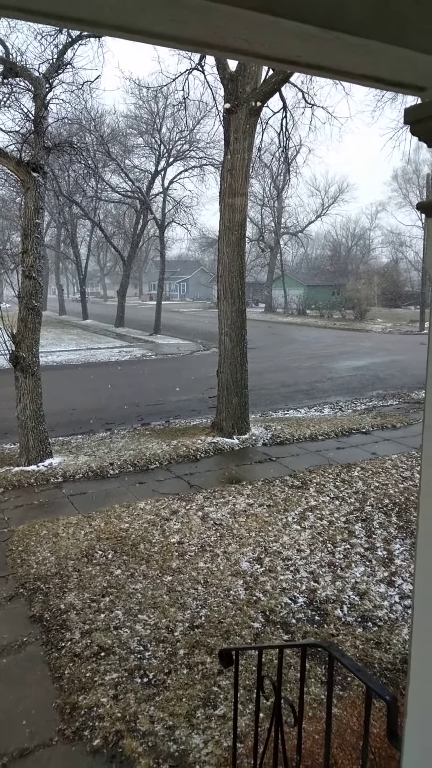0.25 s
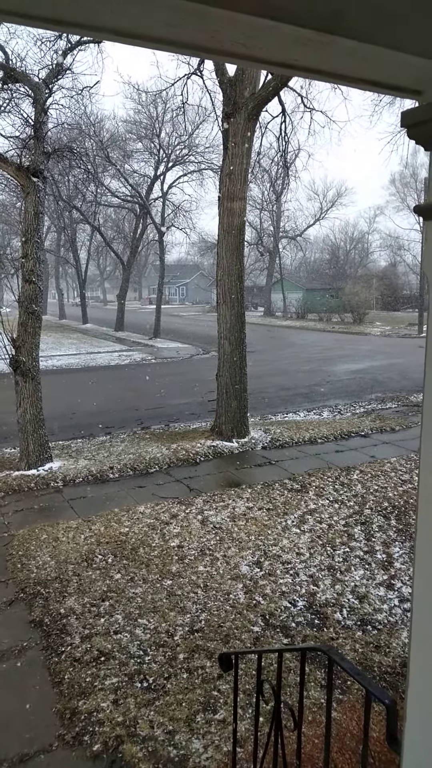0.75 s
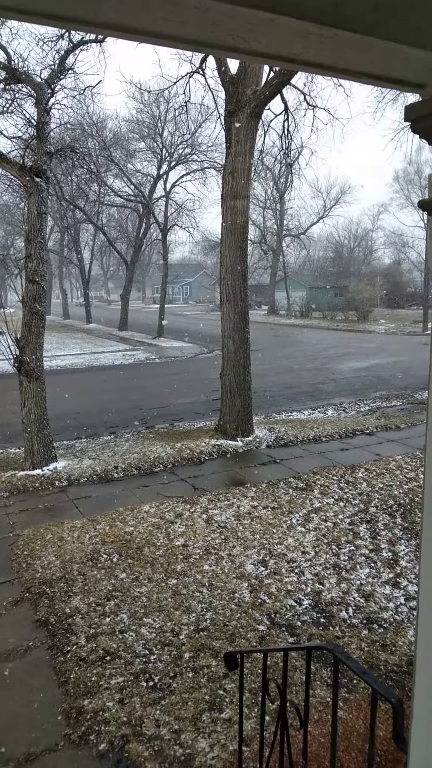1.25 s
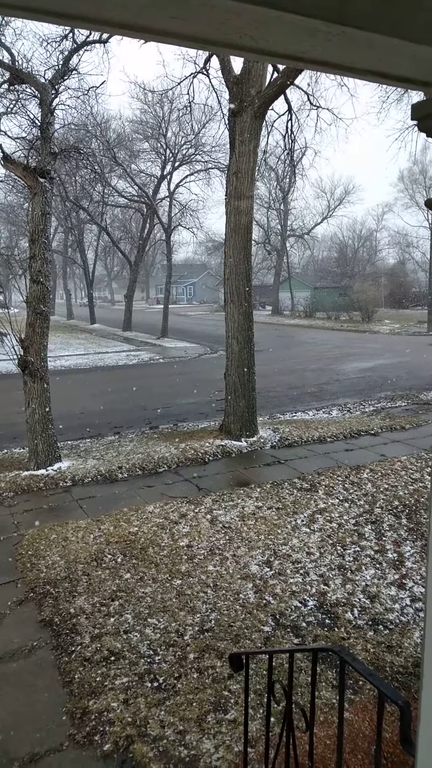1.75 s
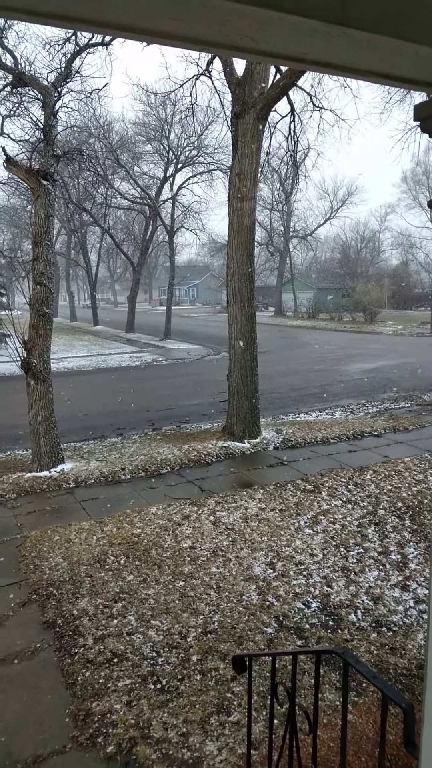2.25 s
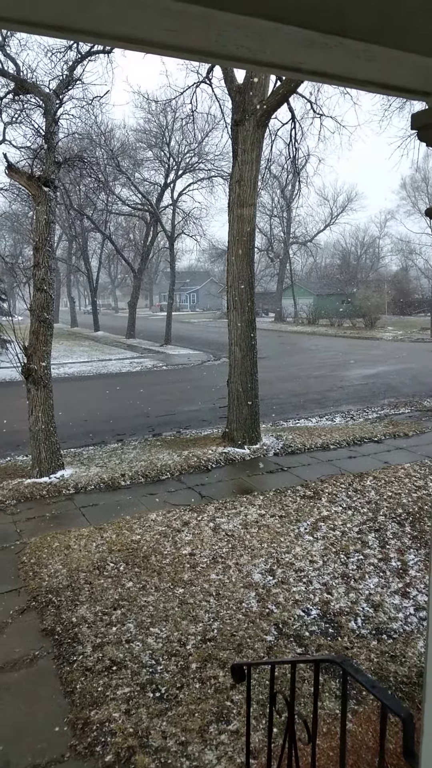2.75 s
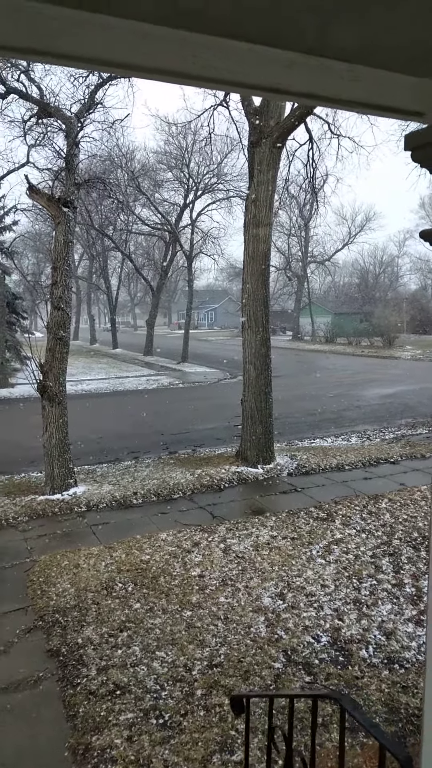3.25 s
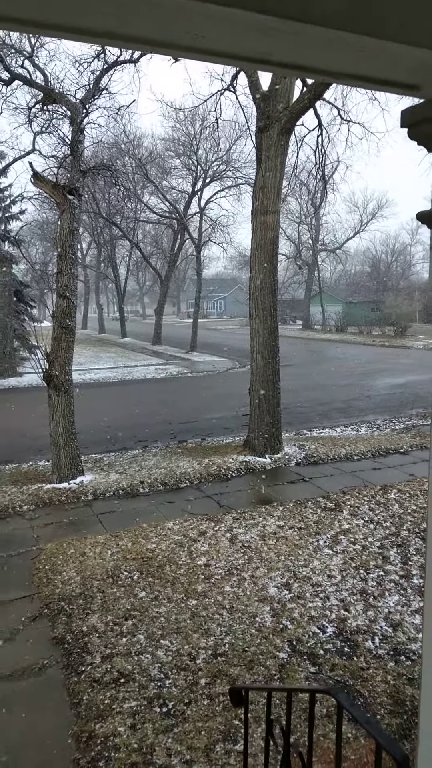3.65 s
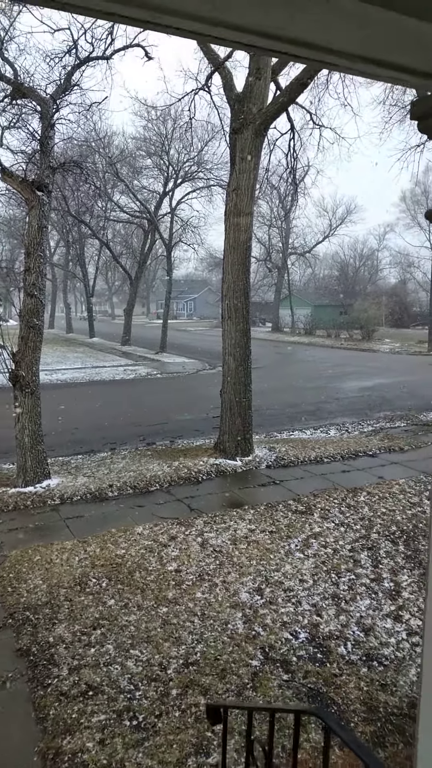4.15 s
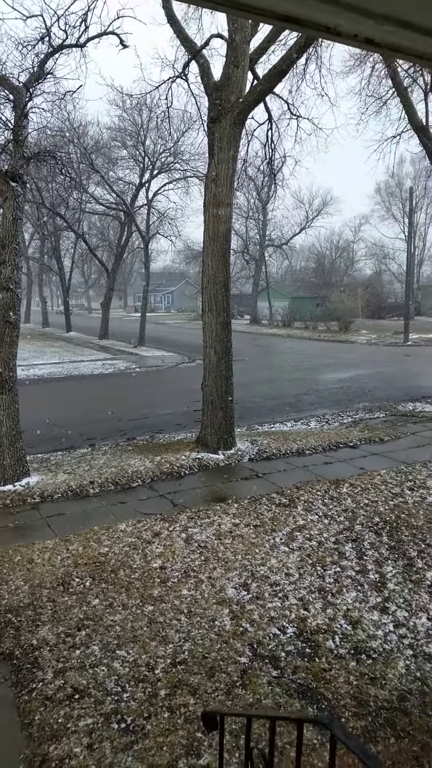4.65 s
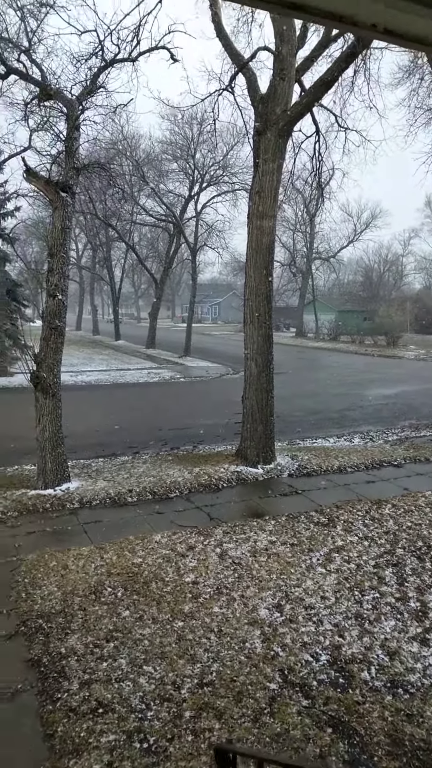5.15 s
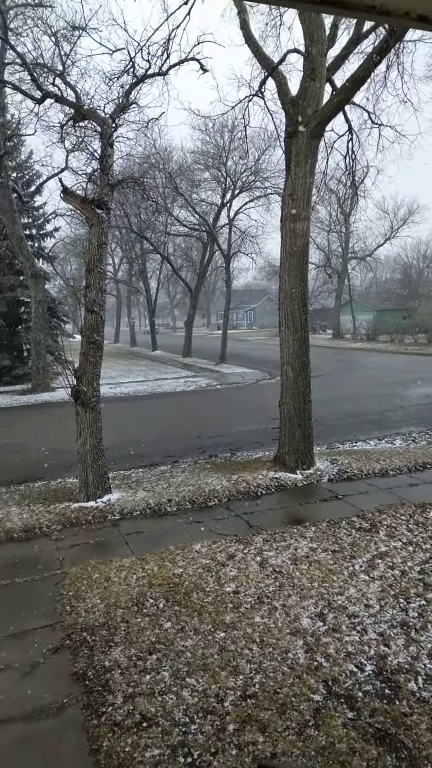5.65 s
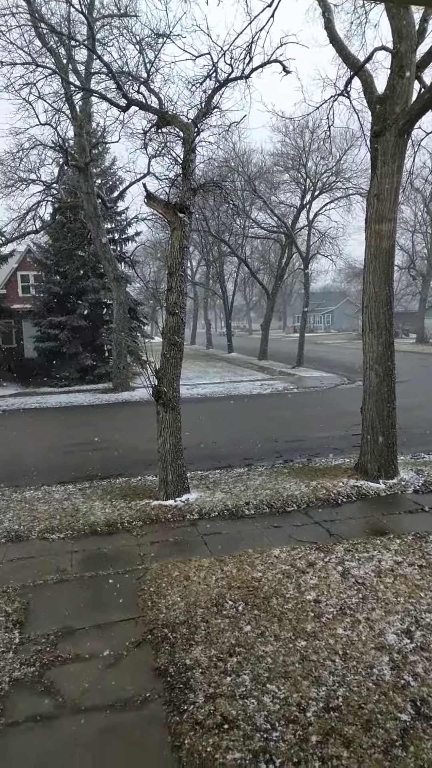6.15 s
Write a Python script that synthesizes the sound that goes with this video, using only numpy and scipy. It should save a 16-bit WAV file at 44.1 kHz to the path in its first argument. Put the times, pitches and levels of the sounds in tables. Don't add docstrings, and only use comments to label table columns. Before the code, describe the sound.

A quiet snowy porch, close and dry, in stereo from a handheld phone. Low distant town rumble and faint machine hums run throughout, with slight hiss. From 0 to 0.5 s, wind rumbles on the right, with a soft push at 0.3, and a few faint pellet ticks. Until about 2.5 s, sparse flurries of millisecond clicks open and shut abruptly, with crisp pings near 0.9 and 2.2. From 2.5 s the patter thickens on rail, steps, boards and lawn, with small wooden taps and soft knocks; a faint thin whine rises around 3.3. A short sleeve brush rustles at 3.75, a long firm raspy one, the loudest rustle, at 4.7 to 4.8, and a quick one at 5.35. Snaps crackle near 5.14 and 6.05. Wind returns after 4.7, with low thumps mostly on the right at 5.65 and strongest at 6.27, until the end at about 6.4.

```python
import sys
import numpy as np
from scipy import signal
from scipy.fft import rfft, irfft
from scipy.io import wavfile
from scipy.ndimage import uniform_filter1d

SR = 44100
rng = np.random.default_rng(int(sys.argv[2]) if len(sys.argv) > 2 else 0)


def makeup_ratio(level_db):
    decades = np.asarray(level_db, float) / 20
    return 10 ** decades


def persist_wave(psi):
    counts = np.round(np.clip(psi, -1, 1) * 32767).astype(np.int16)
    wavfile.write(sys.argv[1], SR, np.atleast_2d(counts).T)


N = 282240
t = np.arange(N) / SR


def colour(x, *tables):
    hz = np.log(np.arange(N // 2 + 1) * SR / N + 1)
    db = 0
    for table in tables:
        point_hz, point_db = np.array(table).T
        db = db + np.interp(hz, np.log(point_hz), point_db)
    return irfft(rfft(x) * makeup_ratio(db), N)


def level(x, db):
    return x * makeup_ratio(db) / np.sqrt(np.mean(x ** 2))


def walk(rate_hz):
    hold = int(SR / rate_hz)
    steps = np.repeat(rng.standard_normal(N // hold + 1), hold)
    return 1.393 * uniform_filter1d(uniform_filter1d(steps, hold), hold)[:N]


# pitch_hz, level_db
LEFT_PORT = [(1000, 7.5), (2300, 10), (5000, 2.5), (7100, 12.5), (8100, 4), (8800, -9.5), (13000, -10)]
RIGHT_PORT = [(1000, 6.5), (2300, 5), (5000, 0), (7500, -5.5), (10000, 5), (11500, -4), (14000, -14)]
TREBLE_LIMIT = [(15700, 0), (15900, -30)]


def through_ports(x, *tables):
    left = colour(x[0], LEFT_PORT, TREBLE_LIMIT, *tables)
    right = colour(x[1], RIGHT_PORT, TREBLE_LIMIT, *tables)
    return np.array([left, right])


# start_s, length_ms, patter_db at start, bright_minus_dull_db
STRUCK = [(.054, 27, -64.5, -2.5), (.1, 24, -69.5, 1), (.853, 18, -65, -0.5), (.916, 50, -57.5, 16),
          (1.853, 25.5, -59, -3), (1.916, 16, -63.5, -2), (2.001, 31, -61, -7), (2.358, 20, -68, -1),
          (2.58, 15, -62.5, -23), (2.744, 16, -65, -5), (2.773, 29, -64, -12), (2.872, 34, -58, -2.5),
          (3.385, 71, -57, -4), (3.495, 32, -65, -10), (3.59, 14.6, -67.5, -4.5), (4.094, 23, -67, -8),
          (4.123, 30, -60.5, -1.5), (4.49, 28, -61, -3.5), (4.936, 44.4, -57.5, -4.5),
          (5.005, 38.5, -58, -0.5), (5.205, 32.4, -55, -1), (5.556, 21, -61.5, 1.5),
          (5.603, 22, -60.5, -13), (5.85, 11, -64.5, -1), (.687, 13, -72.5, -6), (.835, 8, -73, 1.1),
          (5.881, 19, -67.5, -4), (5.917, 32, -59, -11), (5.994, 22, -62, -5), (6.079, 31, -64, 1.5),
          (3.916, 41, -57, -4.5), (4.369, 15, -56.5, -8), (4.384, 19.7, -54, -3), (4.405, 27, -54, -8)]
# start_s, length_ms, patter_db at end, bright_minus_dull_db
SWELLS = [(.605, 22, -63.5, -3.5), (.634, 33, -64, 0.5), (.73, 22.5, -65, 5), (.772, 24, -66, -2),
          (.972, 59, -60.5, 0), (1.339, 39, -63.5, 4), (1.505, 24, -66, 1), (2.518, 14.6, -70, 1.1),
          (1.702, 54.5, -67.5, 4.5), (2.179, 22, -64, 5), (2.474, 28.5, -65.5, -5), (2.593, 59, -58.5, 0.5),
          (2.676, 36.5, -62, -3.5), (2.852, 18.7, -64, 7), (3.308, 47, -60.5, -4), (3.364, 21, -59.5, 1),
          (3.432, 21, -75, -5), (3.854, 16, -67, -2), (4.21, 44.3, -61, -3), (4.262, 29.7, -63.5, -5.5),
          (4.337, 32, -61.5, 7), (4.525, 36, -62.5, -1), (4.566, 31.5, -63, -.6), (5.082, 43.7, -61.5, 0.5),
          (5.13, 75, -60, 0.5), (5.245, 35, -74, -7), (5.42, 25, -69, -2), (5.529, 26, -66, 0),
          (6.02, 19, -67, -2.1), (6.05, 29, -58, 2.5), (4.473, 18, -70, -6), (4.17, 33, -78, -3),
          (4.292, 45, -75.5, -6.5)]
# start_s, length_ms, patter_db, bright_minus_dull_db
EVEN = [(.032, 11, -74, -3), (.168, 22, -73, 4), (1.213, 15, -70.5, -2), (1.301, 12, -70.5, -4),
        (1.409, 27, -66, -0.5), (1.447, 19, -72.5, -2), (1.651, 17, -67, -2.5), (1.955, 11, -71, -4),
        (2.063, 7, -69, 5), (2.281, 28.4, -65.5, -1), (2.952, 21.5, -65, -4.5), (3.099, 32, -66.5, -4.5),
        (3.214, 45, -65, -3), (3.458, 25.5, -67, 1), (3.878, 38, -63.5, -2.5), (3.957, 22, -68.5, -4),
        (4.153, 17, -71, -4), (4.43, 44, -59.5, 1.5), (5.955, 13, -68, -6), (4.9, 30, -66.5, -2),
        (4.996, 11, -63.5, 3), (5.275, 35, -64.5, -3.5), (5.455, 33, -69, -0.5), (5.497, 31, -64.5, 0),
        (5.591, 11, -72, 15), (5.652, 12, -74, 6), (4.008, 9.9, -74, -5), (5.787, 22, -69.5, -2),
        (6.211, 7.4, -74.5, -8), (6.358, 8.3, -68, -7), (.012, 8, -67, -2), (.152, 5, -76, 8),
        (.294, 7.2, -73, -2), (.313, 4.8, -75, 6), (.354, 6.2, -73, 3), (.38, 4, -77, 6), (.42, 5, -76, -4),
        (.565, 14, -75, -3), (1.538, 12, -72.5, 1), (1.599, 5.5, -72.5, -5), (1.843, 6.4, -74, 8),
        (1.937, 8.9, -72, -6), (2.214, 9, -71, 0), (2.817, 7.7, -71, 2), (3.285, 6, -70, .5),
        (3.553, 12, -73, -7), (5.076, 2.9, -66, -21), (5.254, 7, -71, 1), (5.706, 21, -74.5, -4),
        (5.869, 6, -75, -3)]
# time_s, patter_db, bright_minus_dull_db
BRUSHES = [
    [(3.693, -67, -4), (3.708, -60, -3.5), (3.754, -51.5, -4), (3.812, -54, -3), (3.844, -62, -5)],
    [(4.667, -64, -6), (4.678, -57, 0), (4.703, -50.5, 4), (4.714, -45, -8), (4.741, -45.5, -1.5),
     (4.757, -44.5, 0), (4.785, -49.5, -2), (4.81, -58, -5), (4.828, -62.5, -2)],
    [(5.322, -66, -4), (5.333, -56.5, -2), (5.357, -49.5, 2), (5.395, -58, -6.5), (5.417, -61, 7)],
]
SHUT_DB, SHUT_BRIGHT_DB = -86.5, 7.5
FADE_DB, BUILD_DB = 5.5, 7.5
BLOW_DB, BLOW_S = 0.5, 0.0011


def gate():
    db = SHUT_DB + walk(25)
    bright_db = np.full(N, SHUT_BRIGHT_DB)
    for table, start_db, end_db in ((STRUCK, 0, -FADE_DB), (SWELLS, -BUILD_DB, 0), (EVEN, 0, 0)):
        for start_s, length_ms, patter_db, tilt_db in table:
            span = slice(int(start_s * SR), int((start_s + length_ms / 1000) * SR))
            db[span] = patter_db + np.linspace(start_db, end_db, len(db[span]))
            bright_db[span] = tilt_db
    for start_s, *_ in STRUCK:
        db += BLOW_DB * (t > start_s) * np.exp(-np.abs(t - start_s) / BLOW_S)
    for time_s, patter_db, tilt_db in map(np.transpose, BRUSHES):
        span = (t >= time_s[0]) & (t < time_s[-1])
        db[span] = np.interp(t[span], time_s, patter_db)
        bright_db[span] = np.interp(t[span], time_s, tilt_db)
    return uniform_filter1d(db, size=70), uniform_filter1d(bright_db, size=70)


PORT_LAG = 24


def grains(per_s, spread_db, blur, alike):
    size_db = spread_db * np.minimum(rng.exponential(size=N), 1.5)
    hits = (rng.random(N) < per_s / SR) * makeup_ratio(size_db)
    burst = level(signal.lfilter([1], [1, -np.exp(-1 / (0.0011 * SR))], hits), 0)
    burst = np.minimum(burst, 2.1) + blur
    left, other = rng.standard_normal((2, N))
    alike = np.clip(alike, 0, 1)
    right = np.roll(burst * (alike * left + np.sqrt(1 - alike ** 2) * other), PORT_LAG)
    return np.array([burst * left, right * makeup_ratio(2.0 * walk(120))])


# pitch_hz, level_db
DULL = [(200, -30), (600, 0), (1300, -4), (2300, -3.5), (3000, -2.5), (4200, -9.5), (5500, -11.5),
        (8000, -51)]
BRIGHT = [(2500, -13), (4000, -0.5), (5500, -3), (8000, -3.5), (11000, -3.5), (15000, -8.5)]
TOP_KNEE_DB, TOP_LOSS = -61, 0.38


def patter(db, bright_db):
    layers = []
    for body, low_hz, bands, alike in ((DULL, 600, 5, .55), (BRIGHT, 3500, 4, .1)):
        layer = 0
        for hz in low_hz * 1.728 ** np.arange(bands):
            band = [(hz / 2.2, -30), (hz / 1.3, -3), (hz * 1.3, -3), (hz * 2.2, -30)]
            raw = grains(per_s=900, spread_db=3.2, blur=.8, alike=alike)
            layer = layer + makeup_ratio(1.3 * walk(35)) * through_ports(raw, body, band)
        layers.append(level(layer, 0))
    dull, bright = layers
    top = colour(bright, [(11000, -37), (12800, -17)])
    bright = bright - top * (1 - makeup_ratio(-TOP_LOSS * np.maximum(db - TOP_KNEE_DB, 0)))
    dull_share = 1 / (1 + makeup_ratio(2 * bright_db))
    dull = makeup_ratio(-0.42) * np.sqrt(dull_share) * dull
    bright = makeup_ratio(-1.08) * np.sqrt(1 - dull_share) * bright
    return makeup_ratio(db) * (dull + bright)


# pitch_hz, level_db per Hz
TOWN = [(10, -7), (25, -1), (60, -3.5), (110, -4.5), (200, -11.5), (400, -16), (640, -20), (900, -26.5),
        (1300, -36), (2400, -89)]
# pitch_hz, likeness (0-1)
LIKENESS = [(30, 1), (130, 0.98), (290, 0.77), (640, 0.29), (1400, 0)]
TOWN_DB = -52.5


def town(db):
    out, swell = 0, walk(5)
    lift_db = uniform_filter1d(np.clip(db + 75.0, 0, 22), size=300)
    like_hz, likeness = np.array(LIKENESS).T
    for hz in 14 * 2 ** np.arange(0, 7.6, .5):
        band = [(hz / 2 ** .5, -40), (hz / 2 ** .3, -6), (hz, 0), (hz * 2 ** .3, -6), (hz * 2 ** .5, -40)]
        mid, side = colour(rng.standard_normal((2, N)), band, TOWN)
        like = np.clip(np.interp(np.log(hz), np.log(like_hz), likeness), 0, 1)
        drift_db = 0.28 * swell * (hz > 150) + 0.79 * walk(2.73)
        gain = makeup_ratio(drift_db + 0.25 * lift_db * min(hz / 440.0, 1))
        out = out + gain * (np.sqrt(1 + like) * mid + np.sqrt(1 - like) * side * np.array([[1], [-1]]))
    return level(out, TOWN_DB)


# pitch_hz, width_hz, level_db
HUMS = [
    (84.02, 0.98, -61.5),
    (103.5, 7.8, -72.5),
    (318.5, 18, -70),
    (383.1, 4.6, -71),
]
# time_s, level_db
WHINE = [
    (2.9, -83),
    (3.3, -68),
    (5.6, -72),
    (5.9, -77),
]
WHINE_HZ = 614


def machinery():
    whine_db = np.interp(t, *np.transpose(WHINE)) + 2.1 * walk(14)
    out = makeup_ratio(whine_db) * np.sin(2 * np.pi * np.cumsum(WHINE_HZ + walk(3.08)) / SR)
    for hz, width_hz, db in HUMS:
        hum = signal.lfilter(*signal.iirpeak(hz, hz / width_hz, SR), rng.standard_normal(N))
        out = out + level(hum, db)
    return out


# time_s, level_db
WIND = [(0, -41.5), (.08, -44), (.2, -45.5), (.26, -49), (.45, -56.5), (4.6, -57), (4.82, -47),
        (5.05, -50.5), (5.45, -50.5), (5.62, -44), (5.9, -43.5), (6.16, -47.5), (6.3, -41.5), (6.4, -52)]
# pitch_hz, level_db per Hz
GUST = [(4, -3), (25, 11), (50, -3.5), (90, 0.5), (160, -24), (400, -81)]
# time_s, peak_db, swing_ms, sign, left_share
BUFFETS = [
    (.299, -27, 3.25, 0.9, 0.025),
    (4.687, -33.5, 3.35, -1.32, 0.67),
    (5.635, -33.5, 6.4, -1.1, .03),
    (5.662, -25, 3.4, -0.76, .03),
    (6.266, -22, 5.1, 1, 0.018),
    (6.346, -32, 5.2, -0.89, 0.027),
    (6.385, -29.5, 4.5, 1, .03),
]


def wind():
    rush_db = np.interp(t, *np.transpose(WIND)) + 1.0
    rush = level(colour(rng.standard_normal(N), GUST), 0) * makeup_ratio(rush_db)
    out = np.array([0.06 * rush, rush])
    for s, db, swing_ms, sign, left_share in BUFFETS:
        u = (t - s) * 1000 / swing_ms
        push = np.exp(-u ** 2) - 0.52 * np.exp(-((u - 2.4) / 2.1) ** 2)
        out += sign * makeup_ratio(db) * push * np.array([[left_share], [1]])
    return out


# pitch_hz, level_db per Hz
HISS = [(1000, -5), (2000, 2), (3200, -5), (5000, -3), (8000, -14), (11000, -6), (15000, 6)]
HISS_DB = -85.5


def hiss():
    return level(through_ports(rng.standard_normal((2, N)), HISS), HISS_DB)


# time_s, left_db, right_db, fade_ms
SNAPS = [
    (5.136, -52, -52, .7),
    (5.149, -58, -58, .5),
    (.987, -57, -50, .6),
    (2.179, -54, -54, .6),
    (3.252, -63, -62, .5),
    (4.939, -58, -58, .5),
    (6.045, -49, -48, 0.88),
    (6.048, -53, -49, .6),
    (6.06, -53, -42, 0.92),
]
CRACK_DB, CRACK_MS = -6, .3


def snaps():
    cracks = [(s, db + CRACK_DB, db + CRACK_DB, CRACK_MS) for s, _, db, _ in STRUCK]
    out = 0
    for s, left_db, right_db, fade_ms in list(SNAPS) + cracks:
        fade = (t > s) * np.exp(-np.abs(t - s) * 1000 / fade_ms)
        out = out + makeup_ratio(np.array([[left_db], [right_db]])) * fade
    spray = out * makeup_ratio(3.0 * walk(201)) * rng.standard_normal((2, N))
    return colour(spray, [(3000, -23), (9000, -0.5), (15700, 2), (16600, -14), (17000, -50)])


# start_s, peak_db, pitch_hz
TAPS = [(.055, -63, 626), (1.407, -61, 700), (1.744, -52, 560), (1.935, -54, 520), (2.357, -55, 580),
        (2.563, -55, 595), (2.746, -52, 625), (3.121, -50, 600), (3.291, -52, 517), (3.512, -53, 486),
        (4.388, -52, 595), (4.718, -58, 800), (5.231, -54, 1050), (5.787, -54, 600), (6.245, -54, 660),
        (6.334, -60, 500)]
TAP_FADE_S = 0.0042


def taps():
    out = np.zeros(N)
    for s, db, hz in TAPS:
        age = np.maximum(t - s, 0)
        out += makeup_ratio(db + 0.5) * np.exp(-age / TAP_FADE_S) * np.sin(2 * np.pi * hz * age)
    return out


# time_s, peak_db, pitch_hz
KNOCKS = [(2.029, -62.5, 333), (2.55, -60.5, 277), (2.78, -57, 389), (2.96, -61.5, 339),
          (3.4, -59.5, 398.4), (4.13, -58, 290), (4.23, -62, 298.4), (4.41, -58.5, 350.4), (4.76, -62, 392),
          (4.951, -59, 420), (5.035, -61, 327), (5.12, -58.5, 301.2), (5.19, -58.5, 343), (.08, -67, 298),
          (.36, -62, 387), (.57, -64.5, 350), (1.03, -63.5, 333), (1.95, -60.5, 300), (3.73, -62.5, 420),
          (3.85, -64, 356), (5.5, -63.5, 323), (5.28, -60, 290.5), (5.36, -64, 330), (5.93, -60, 350)]


def knocks():
    thud_tone = [(120, -62), (250, 21.0), (600, -5.5), (1500, -37), (4000, -90)]
    thud = level(colour(rng.standard_normal((2, N)), thud_tone), 0.0)
    out = np.zeros((2, N))
    for s, db, hz in KNOCKS:
        swell = np.exp(-((t - s) / 0.03) ** 2)
        out += makeup_ratio(db) * swell * (thud + 1.63 * np.sin(2 * np.pi * hz * t))
    return out


# time_s, peak_db, left_minus_right_db
RAIL = [(.3247, -53.5, 7), (.9144, -42, 5), (.9251, -38, 13.8), (.927, -40, 11), (.9858, -41, 5),
        (.9892, -41, -8.7), (1.666, -48.5, 15), (2.1776, -41.5, 5), (2.1807, -38, -15), (2.5924, -46, 12),
        (2.5942, -36, 11), (2.6049, -36.5, 7), (3.6931, -52, 11), (3.7127, -36.5, 19), (4.4973, -44, 10),
        (4.5449, -44, 23), (5.1362, -36, 7), (5.1392, -39, -2.1), (5.1484, -42, 17), (5.1518, -37, 3),
        (6.0454, -46, 11), (6.0482, -52, 7)]
STEPS = [(.6495, -43, 15), (.6891, -50, 11), (1.3585, -41, 17), (1.7932, -53, 6), (1.8538, -36.5, 16),
         (1.9141, -49, 10), (2.0632, -57, 10), (2.2498, -49, 5.5), (2.2915, -36, -16), (2.5826, -43, 9),
         (2.7447, -53, 11), (2.8734, -34.5, 6.5), (3.2167, -51, 9), (3.3846, -39, 6), (3.8803, -54, 14),
         (4.4065, -37, 10), (4.9336, -43, 19), (5.0076, -50, 2.1), (5.2069, -47, 10), (5.5912, -53, 10.6)]
BOARDS = [(1.1653, -54, 6.6), (1.6507, -54, 8.4), (3.2926, -51, 6), (3.3081, -49, 12), (3.4078, -38.5, 12),
          (3.4935, -47, 9.9), (4.0962, -51, 3), (4.1328, -36.5, 1.1), (4.2646, -50, 10),
          (4.3708, -35.5, 21), (4.8998, -51, 7), (5.1085, -41, 6.5), (5.5597, -38.5, 16),
          (5.6056, -43, 9.7), (5.8801, -49, 5), (5.9569, -48, 11), (5.9946, -56, 12.3), (6.0251, -51, 10.1),
          (6.2156, -54, 4)]
# time_s, peak_db, left_minus_right_db
LAWN = [(.9635, -45, 8), (1.0155, -47, 6), (2.003, -60, -1), (3.7565, -41, 14), (3.917, -52, 9),
        (4.217, -58, 6), (4.3845, -43, 9), (4.713, -34, 2), (5.184, -46, 5), (5.2755, -59, -1),
        (5.34, -49, 13), (5.917, -50, 8)]
RAIL_HZ, STEPS_HZ, BOARDS_HZ, LAWN_HZ = 7350, 5100, 3400, 1980
PITCH_SCATTER = .07


def pellets():
    out, age = np.zeros((2, N + 600)), np.arange(600) / SR
    for table, hz in ((RAIL, RAIL_HZ), (STEPS, STEPS_HZ), (BOARDS, BOARDS_HZ), (LAWN, LAWN_HZ)):
        for s, db, pan_db in table:
            noise = rng.standard_normal((2, 600))
            shape = (1 - np.exp(-age / .00015)) * np.exp(-age / .00045 * min(hz / 4500, 1))
            pitch_hz = hz * (1 + PITCH_SCATTER * noise[0, 0]) * np.array([[1], [1.15]])
            click = shape * (np.sin(2 * np.pi * pitch_hz * age) + 0.26 * noise)
            scatter = 0.12 * np.exp(-age / 0.012) * noise
            side_db = np.minimum([[pan_db - 9.0], [5.5 - pan_db]], 0)
            at = max(int((s - .0004) * SR), 0)
            out[:, at:at + 600] += makeup_ratio(db + side_db - 5.5) * (click + scatter)
    return through_ports(out[:, :N], [(600, -29), (1500, -7.5), (14000, 2.0)])


WEAVE_HZ, WEAVE_WIDTH_HZ, WEAVE_DB = 2370, 980, -41


def sleeve(db):
    band = [(WEAVE_HZ - WEAVE_WIDTH_HZ * 2, -30), (WEAVE_HZ, 0), (WEAVE_HZ + WEAVE_WIDTH_HZ * 2, -30)]
    rasp = through_ports(grains(per_s=760, spread_db=5.0, blur=1.3, alike=0.13), band)
    return level(rasp, 0) * makeup_ratio(2 * db - WEAVE_DB + 0.8 * walk(60))


def scene():
    db, bright_db = gate()
    flurries = patter(db, bright_db) + snaps() + pellets() + sleeve(db)
    distance = town(db - 2.0 * bright_db) + machinery()
    return flurries + distance + wind() + taps() + knocks()


def top_cut(x):
    return signal.sosfilt(signal.butter(12, 16780, fs=SR, output="sos"), x)


def record(dry):
    ease = np.clip(np.minimum(t, t[-1] - t) / .006, 0, 1)
    return top_cut(dry * ease + hiss())


dry = scene()
out = record(dry)
persist_wave(out)
```